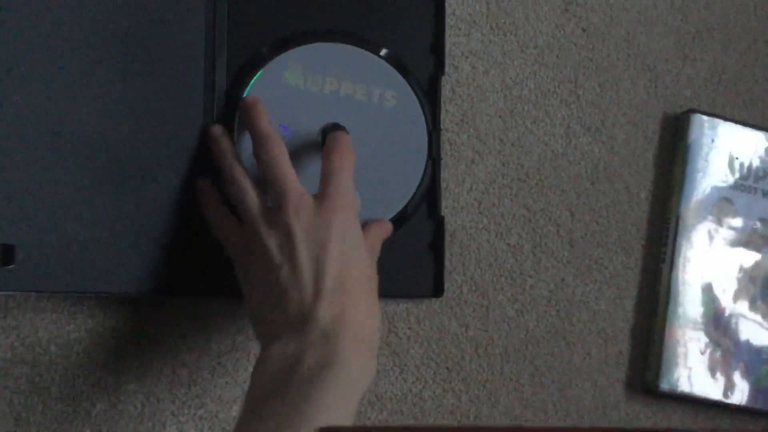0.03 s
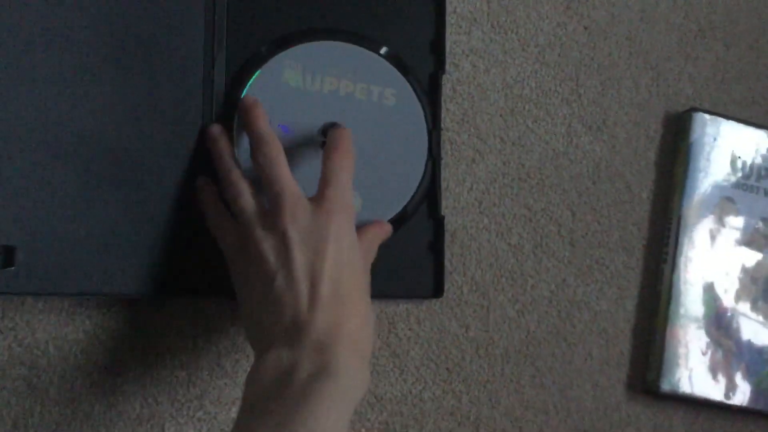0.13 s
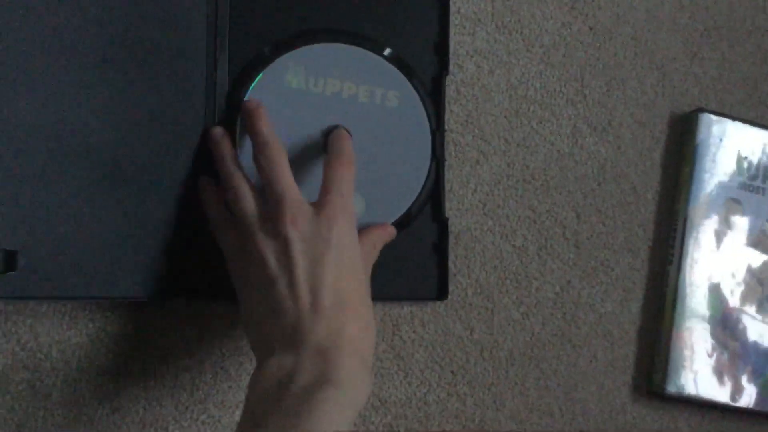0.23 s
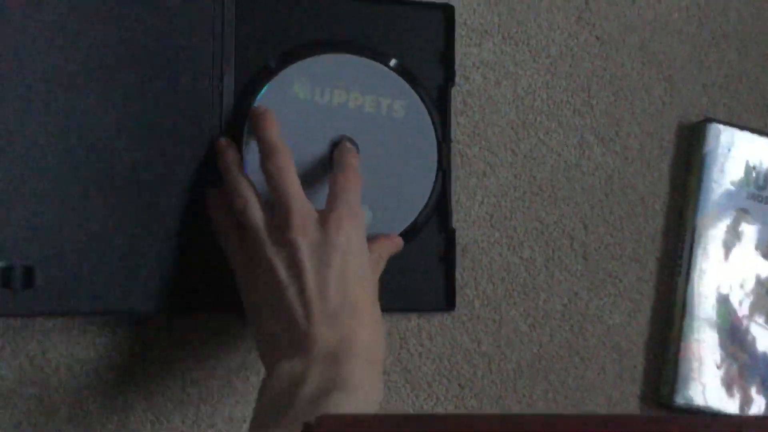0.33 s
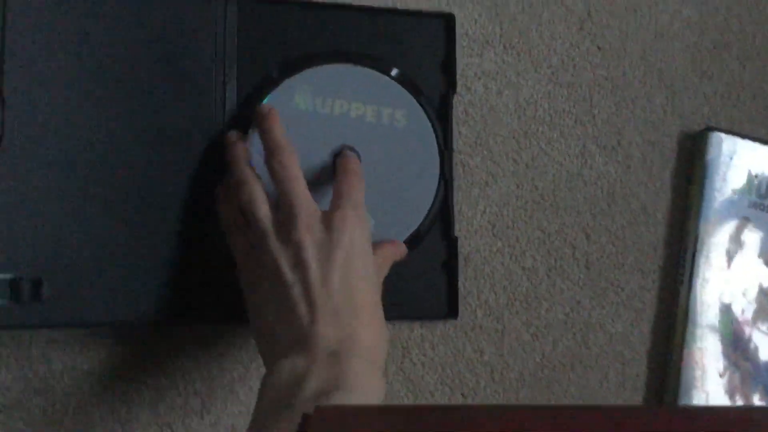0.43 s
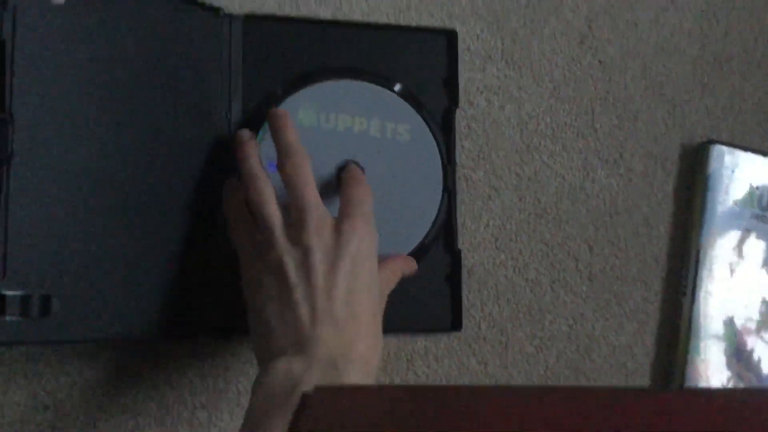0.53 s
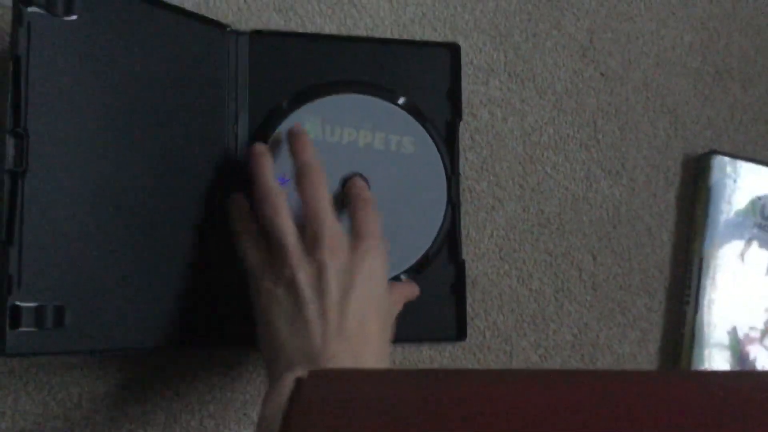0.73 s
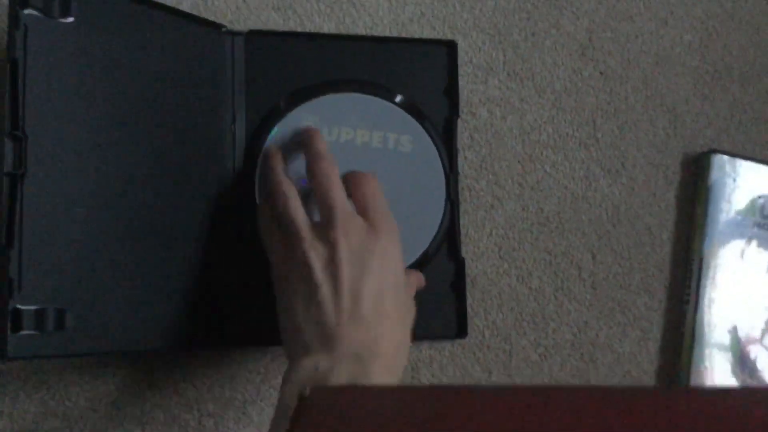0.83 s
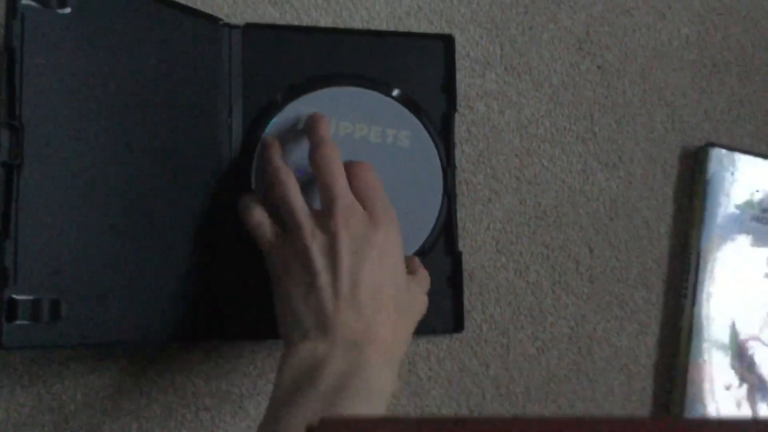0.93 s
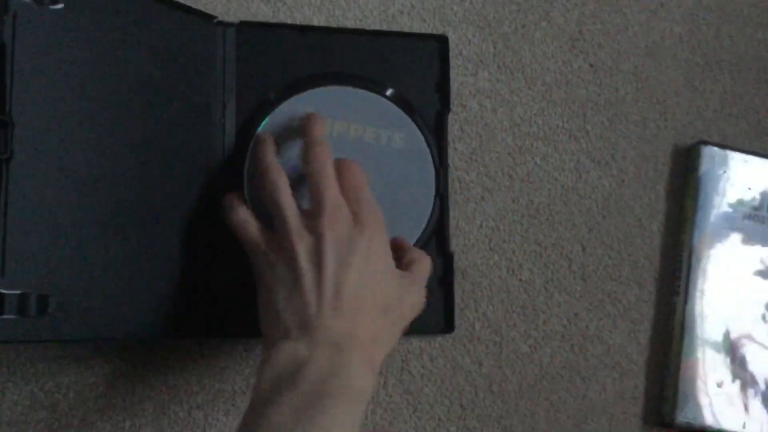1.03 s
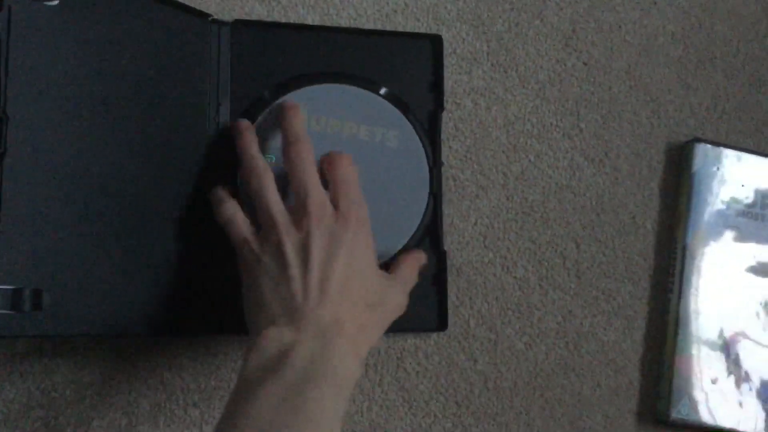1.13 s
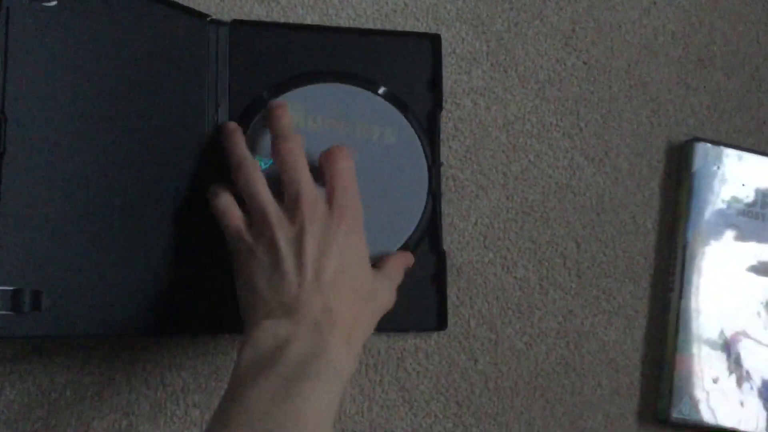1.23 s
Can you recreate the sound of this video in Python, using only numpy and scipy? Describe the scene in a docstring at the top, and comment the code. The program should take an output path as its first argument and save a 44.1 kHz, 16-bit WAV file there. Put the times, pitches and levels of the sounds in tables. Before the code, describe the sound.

Hard plastic clicks and snaps from a disc in its case, over faint low hum

```python
"""In a small quiet room, a finger presses the hub of a plastic disc case lying on a carpet. The hub's teeth snap
and tick: short damped modes of disc and shell, with noise cracks and a low thud. A creak of narrow-band noise
swells before each snap; clusters of tiny ticks make the plastic rattle on. The snaps reverberate faintly in the
room, over a mains hum of three sines, a faint hiss and a low rumble of coloured noise."""
import sys
import numpy as np
from scipy import signal
from scipy.fft import rfft, irfft, next_fast_len
from scipy.io import wavfile
from scipy.ndimage import map_coordinates

SR = 44100
rng = np.random.default_rng(int(sys.argv[2]) if len(sys.argv) > 2 else 0)


def persist_wave(psi):
    """Save psi, clipped to +-1, as 16-bit WAV."""
    counts = np.round(np.clip(psi, -1, 1) * 32767).astype(np.int16)
    wavfile.write(sys.argv[1], SR, np.atleast_2d(counts).T)


def to_linear_factor(level_db):
    """Convert decibel levels (scalar or array-like) to linear amplitude factors."""
    exponent = np.asarray(level_db, float) / 20
    return 10 ** exponent


N = 57330  # samples, 1.3 s

# Snaps of the hub teeth. Each row: start in seconds, level in dB, ring frequency in Hz, crack in dB and thud
# in dB, both re level and before a common trim, and ring t60 in seconds.
TOOTH_SNAPS = [(.0005, -50, 760, -34, -27, 0.025), (0.069, -62, 1780, -30, -24, .012),
               (0.1429, -29.5, 2070, -18, -13.5, 0.007), (0.1464, -32.5, 1300, -19, -11, 0.0059),
               (0.148, -42, 3990, -20, -20, 0.015), (0.217, -31, 1900, -20, -24, 0.005),
               (0.2311, -11, 1900, -10, -25, 0.0083), (.244, -4.5, 2070, -11, -28.5, 0.0037),
               (0.2544, -11.5, 2110, -16.5, -18.5, 0.011), (0.3632, -2, 2002, -16.5, -27.5, 0.011),
               (0.3654, -8.5, 2880, -3, -24.5, 0.01), (.378, -13.5, 2000, -25, -30.5, 0.0082),
               (.393, -34, 985, -31, -33, 0.15), (0.6057, -44, 1827, -34.5, -24.5, 0.026),
               (.622, -43, 1032, -32, -33, 0.013), (0.7549, -51, 2100, -1.5, -23, 0.015),
               (0.772, -40.5, 1880, -31.5, -41, 0.034), (0.7918, -32.5, 1400, -37, -18.5, 0.01),
               (0.8104, -24.5, 1920, -13.5, -22.5, 0.017), (1.026, -35, 1744, -8.5, -18, 0.022),
               (1.0943, -52, 2096, -32, -12, .015), (1.1066, -48.5, 1390, -26, -3.5, .018),
               (1.1359, -13, 2104, -25, -26, 0.014), (1.1736, -26, 1590, -14, -23, 0.0086),
               (1.182, -38.5, 3850, -22.5, -39, 0.057), (1.249, -58, 1570, -5, -15, 0.013),
               (1.2811, -30, 1100, -27.5, -32, 0.015), (1.283, -39.5, 720, -33, -42, 0.033)]
# Modes of disc and shell. Each row: frequency in Hz, level in dB, t60 in seconds.
SHELL_MODES = [(687, -21.5, 0.027), (985, -29, 0.063), (1426, -12.5, 0.016), (1900, -18.5, 0.0099),
               (2331, -13, 0.02), (2880, -27, 0.022), (3823, -25.5, 0.035), (4227, -18.5, 0.0095),
               (6050, -30.5, .012), (6430, -32, 0.043)]
# Spectrum of plastic contact noise. Each row: frequency in Hz, relative level in dB.
CONTACT_SPECTRUM = [(100, -43), (250, -13.5), (450, -27.5), (700, -7.5), (1300, -4.5), (2000, -1.5),
                    (2700, -6.5), (3300, -13), (3900, -15), (5000, -19), (7000, -38.5), (12000, -71.5)]


def unit(x):
    """Normalisation: scale to rms 1."""
    return x / np.sqrt(np.mean(x ** 2) + 1e-20)


def along(points, hz):
    """Interpolation of (Hz, value) points on a logarithmic frequency axis."""
    f, v = np.transpose(points)
    return np.interp(np.log(hz + 1), np.log(f + 1), v)


def filtered(x, response):
    """Linear filtering: the spectrum of x times a zero-phase response of frequency."""
    m = next_fast_len(len(x) + 8192)
    hz = np.fft.rfftfreq(m, 1 / SR)
    return irfft(rfft(x, m) * response(hz), m)[:len(x)]


def coloured(x, spectrum):
    """Spectral shaping: x filtered by (Hz, dB) points, then scaled to rms 1."""
    return unit(filtered(x, lambda hz: to_linear_factor(along(spectrum, hz))))


def decay(t, t60):
    """Exponential damping: the level falls by 60 dB in t60 seconds."""
    return to_linear_factor(-60 * t / t60)


def noise(count):
    """White noise: independent Gaussian samples."""
    return rng.standard_normal(count)


def ring(modes, t, scatter_db, detune):
    """Modal superposition: damped sines, with strength and pitch scattered at random on each call."""
    total = np.zeros(len(t))
    for hz, db, t60 in modes:
        strength_luck, pitch_luck = rng.standard_normal(2)
        mode_hz = hz * (1 + detune * pitch_luck)
        strength = to_linear_factor(db + scatter_db * strength_luck)
        total += strength * decay(t, t60) * np.sin(2 * np.pi * mode_hz * t)
    return total


def snaps():
    """Impulsive excitation: each snap rings a tooth and the shell, clacks, cracks and thuds into the carpet."""
    # Modes of the case on the carpet. Each row: frequency in Hz, level in dB, t60 in seconds.
    carpet_modes = [(195, -6, 0.082), (307, 0.5, .03), (335, -9, 0.037)]
    # Spectrum of the bright crack. Each row: frequency in Hz, relative level in dB.
    crack_spectrum = [(2940, -30.5), (5000, -5.5), (7490, 1.5), (9240, -4.5), (14700, 7.5), (16200, -9.5),
                      (16500, -14)]
    crack_trim_db, thud_trim_db, clack_db = -2.5, 4.5, -16
    crack_t60_s, clack_t60_s, rise_s = 0.012, 0.023, 0.00032
    detune = 0.027  # relative spread of mode pitch
    low_cut_hz = 180
    t = np.arange(SR // 8) / SR
    onset = 1 - np.exp(-t / rise_s)
    out = np.zeros(N + SR)
    for start_s, db, hz, crack_db, thud_db, t60 in TOOTH_SNAPS:
        tooth = decay(t, t60) * np.sin(2 * np.pi * hz * t)
        shell = ring(SHELL_MODES, t, 3, detune)
        clack = to_linear_factor(clack_db) * decay(t, clack_t60_s) * coloured(noise(len(t)), CONTACT_SPECTRUM)
        crack = decay(t, crack_t60_s) * coloured(noise(len(t)), crack_spectrum)
        crack *= to_linear_factor(crack_db + crack_trim_db)
        thud = to_linear_factor(thud_db + thud_trim_db) * ring(carpet_modes, t, 2, detune)
        # The crack alone starts at full strength.
        snap = (tooth + shell + clack + thud) * onset + crack
        first = round(start_s * SR)
        out[first:first + len(t)] += to_linear_factor(db) * snap
    return filtered(out[:N], lambda hz: hz ** 2 / (hz ** 2 + low_cut_hz ** 2))


def squeaks():
    """Sliding friction: a tooth squeaks in a narrow noise band, ever louder until it lets go at the snap."""
    centre_hz, width_hz = 2500, 500
    level_db = -26  # re the snap's level
    rise_s = 0.012  # time for 20 dB
    t = np.arange(N) / SR
    swell = np.zeros(N)
    for start_s, db, *_ in TOOTH_SNAPS:
        approach_db = 20 * np.minimum(t - start_s, 0) / rise_s
        swell += to_linear_factor(db + level_db + approach_db) * (t < start_s)
    creak = filtered(noise(N), lambda hz: np.exp(-((hz - centre_hz) / width_hz) ** 2))
    return swell * unit(creak)


def rattle():
    """Random contact excitation: dense tick bursts over a smooth scrape drive the shell in swells."""
    # Contacts of disc, shell and fingers. Each row: time of the swell's peak in seconds, rise by 20 dB in
    # seconds, level in dB, t60 in seconds, treble in dB re level.
    contact_swells = [(0.002, 0.0048, -63, 0.1, -42), (.125, 0.02, -74, .1, -32),
                      (0.149, 0.019, -40.5, 0.049, -25), (0.179, 0.014, -57.5, 0.042, -16),
                      (0.232, 0.008, -30.5, 0.18, -20), (0.26, 0.025, -29, 0.046, -6.5),
                      (0.274, 0.031, -44.5, .22, -2), (0.362, 0.005, -39.5, 0.059, -24),
                      (0.387, .02, -31.5, 0.14, -6), (0.4, 0.022, -32, 0.16, -14.5),
                      (0.418, .02, -39, 0.15, -16), (.612, 0.0038, -59.5, 0.14, -32),
                      (0.644, 0.06, -73, 0.24, 0.5), (0.716, 0.041, -70, 0.22, -8),
                      (0.777, 0.034, -50, 0.25, -35), (0.801, 0.033, -47, 0.13, -19),
                      (0.818, 0.011, -54, 0.12, -10.5), (.903, .04, -62.5, 0.084, -4),
                      (.96, 0.2, -67.5, 0.61, -19), (1.024, 0.023, -50, 0.077, -4.5),
                      (1.071, .03, -61.5, .2, -18), (1.11, 0.022, -56, 0.074, -27),
                      (1.15, 0.02, -47, 0.076, -11), (1.174, 0.0092, -38, 0.096, -13),
                      (1.188, 0.0085, -47, 0.15, -33), (1.197, 0.017, -42.5, 0.072, -21),
                      (1.248, 0.023, -67, 0.08, -29), (1.284, 0.031, -49, .12, -22)]
    # Spectrum of the treble fizz. Each row: frequency in Hz, relative level in dB.
    fizz_spectrum = [(2800, -29.5), (4300, 3), (5500, 2), (7500, -6.5), (9200, -0.5), (10500, -11),
                     (12500, -2.5), (15500, -9), (16500, -21)]
    ticks_per_s, tick_spread_db, tick_t60_s = 700, 2, 0.0076
    smooth_share, ring_share = 0.8, 0.5
    t = np.arange(N) / SR
    body_power, treble_power = np.zeros(N), np.zeros(N)
    for peak_s, rise_s, db, t60, treble_db in contact_swells:
        slope_db = np.where(t < peak_s, 20 * (t - peak_s) / rise_s, 60 * (peak_s - t) / t60)
        power = to_linear_factor(db + slope_db) ** 2
        body_power += power
        treble_power += to_linear_factor(treble_db) ** 2 * power
    ticks = (rng.random(N) < ticks_per_s / SR) * to_linear_factor(tick_spread_db * noise(N))
    tick_shape = decay(t[:SR // 20], tick_t60_s)
    bursts = unit(signal.fftconvolve(ticks, tick_shape)[:N]) + smooth_share
    drive = bursts * noise(N)
    rung = signal.fftconvolve(drive, ring(SHELL_MODES, t[:SR // 8], 0, 0))[:N]
    body = unit(coloured(drive, CONTACT_SPECTRUM) + ring_share * unit(rung))
    fizz = coloured((bursts + 1) * noise(N), fizz_spectrum)
    return np.sqrt(body_power) * body + np.sqrt(treble_power) * fizz


def room(x):
    """Reverberation: convolution with a delayed noise tail whose decay time depends on frequency."""
    # Decay of the room. Each row: frequency in Hz, t60 in seconds.
    room_decay = [(200, 0.1), (2000, 0.23), (12000, 0.06)]
    delay_s = 0.007  # path by way of the walls
    hz, t, z = signal.stft(noise(SR // 2), SR, nperseg=256)
    damping = decay(t, along(room_decay, hz)[:, None])
    tail = signal.istft(z * damping, SR, nperseg=256)[1]
    delayed = np.pad(x, (round(delay_s * SR), 0))
    return signal.fftconvolve(delayed, tail / np.linalg.norm(tail))[:N]


def hum():
    """Harmonic line spectrum: twice the mains frequency and two overtones, wavering together in level."""
    # Lines of the hum. Each row: frequency in Hz, level in dB rms.
    hum_lines = [(100.3, -51), (200.6, -82.5), (300.9, -70.5)]
    waver_db, wavers_per_s = 0.6, 22
    t = np.arange(N) / SR
    waver = map_coordinates(noise(200), [t * wavers_per_s])
    total = np.zeros(N)
    for hz, db in hum_lines:
        phase = 2 * np.pi * (hz * t + rng.random())
        total += np.sqrt(2) * to_linear_factor(db) * np.sin(phase)
    return to_linear_factor(waver_db * waver) * total


def hiss():
    """Stationary coloured noise: a faint steady hiss at -65.5 dB rms."""
    # Spectrum of the hiss. Each row: frequency in Hz, relative level in dB.
    hiss_spectrum = [(88, -30.5), (150, -11), (222, -5.5), (276, -11.5), (363, -8), (549, -26.5),
                     (594, -24.5), (1300, -27), (9700, -43.5), (16500, -43.5)]
    return to_linear_factor(-65.5) * coloured(noise(N), hiss_spectrum)


def rumble():
    """Low-frequency coloured noise: a steady rumble at -63 dB rms."""
    # Spectrum of the rumble. Each row: frequency in Hz, relative level in dB.
    rumble_spectrum = [(20, -36), (32, -20.5), (42, -1.5), (65, 5.5), (130, -1), (200, -17), (300, -38)]
    return to_linear_factor(-63) * coloured(noise(N), rumble_spectrum)


def scene():
    """Linear superposition: snaps with their room, squeaks and rattle over hum, hiss and rumble."""
    hits = snaps()
    room_db = -23
    case = hits + to_linear_factor(room_db) * room(hits) + squeaks() + rattle()
    background = hum() + hiss() + rumble()
    return (case + background)[None]


def band_limit(x):
    """A steep low-pass at the top of the band."""
    return signal.sosfilt(signal.butter(12, 16640, fs=SR, output="sos"), x)


def record(dry):
    """Band limitation: a steep low-pass removes the highest treble."""
    top_hz = 15900
    mix = filtered(dry[0], lambda hz: 1 / (1 + (hz / top_hz) ** 80))[None]
    return band_limit(mix)


dry = scene()
out = record(dry)
persist_wave(out)
```